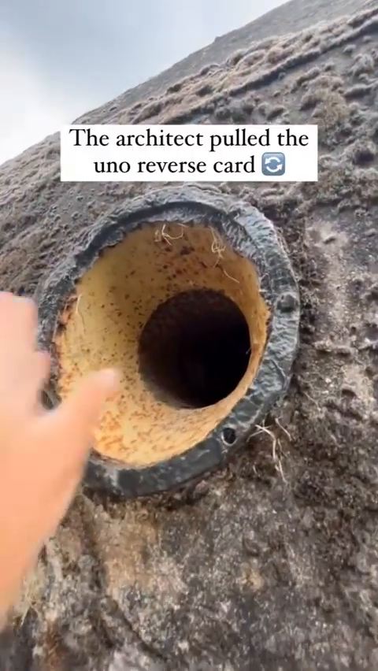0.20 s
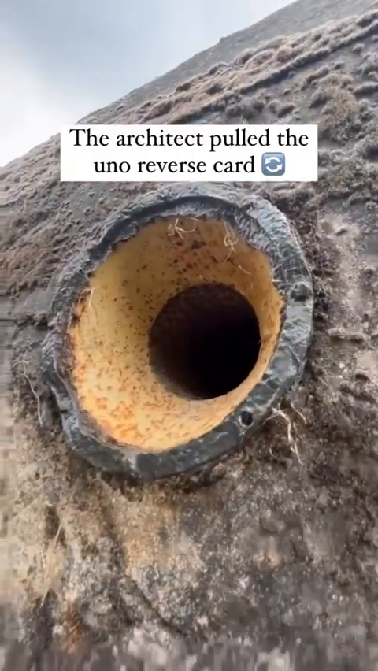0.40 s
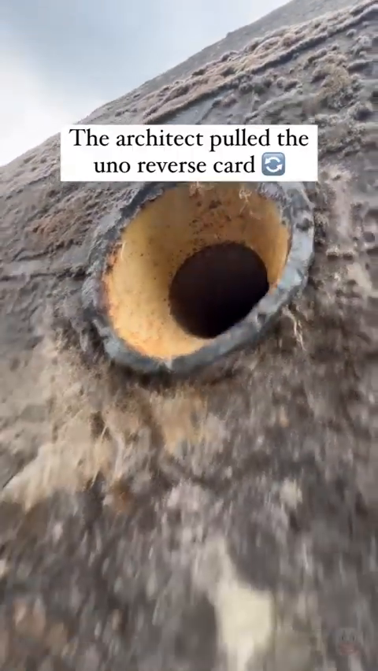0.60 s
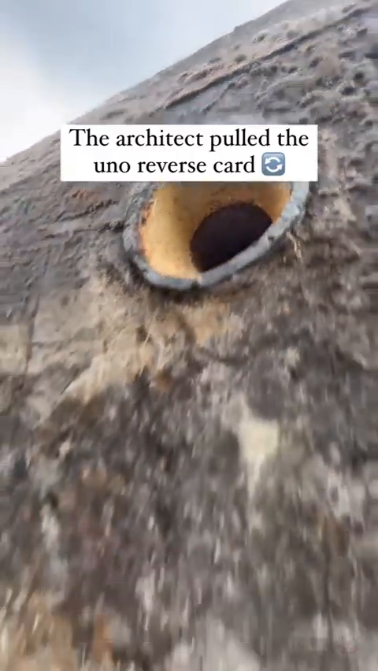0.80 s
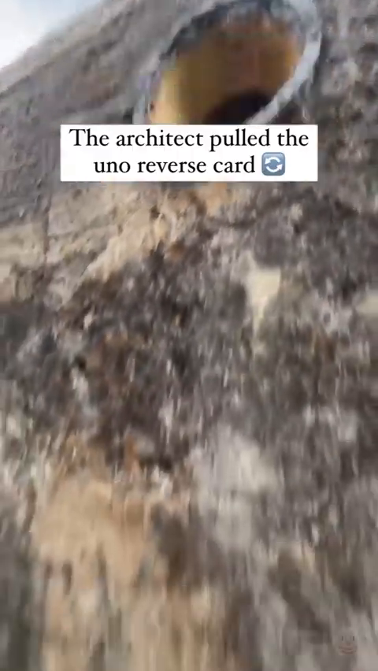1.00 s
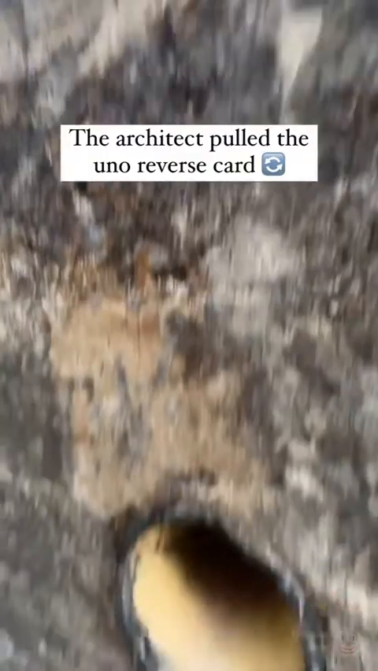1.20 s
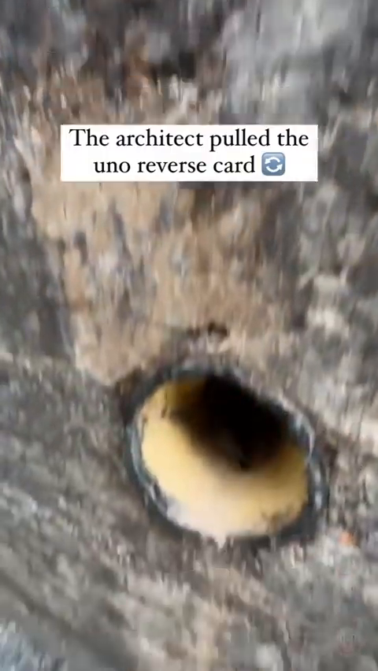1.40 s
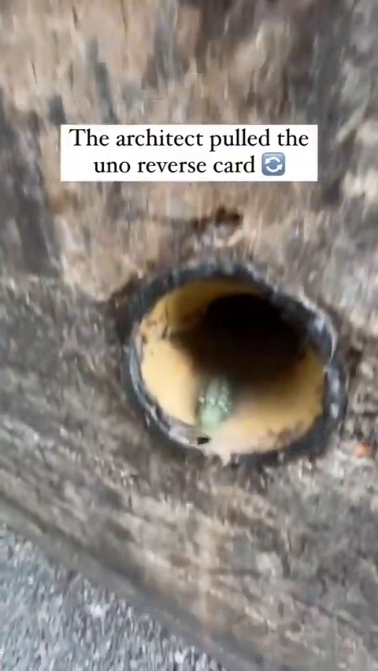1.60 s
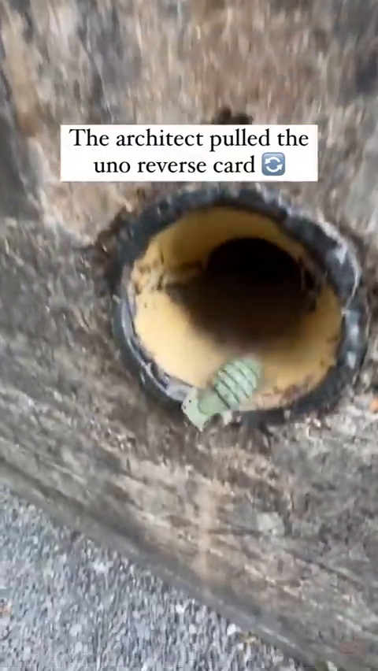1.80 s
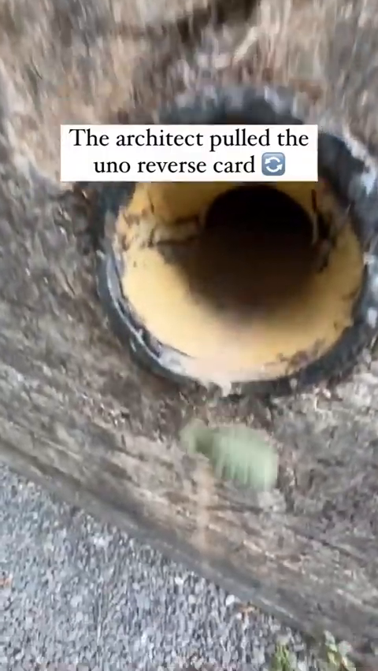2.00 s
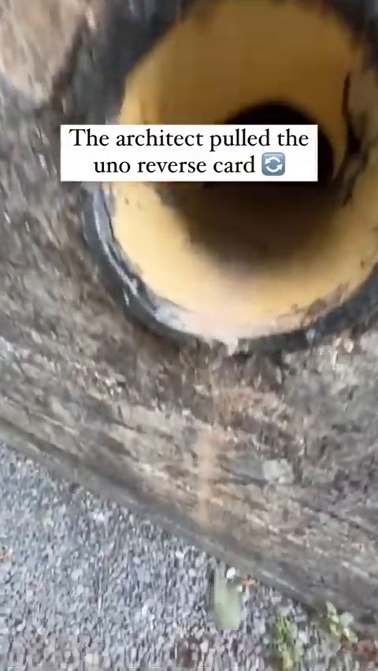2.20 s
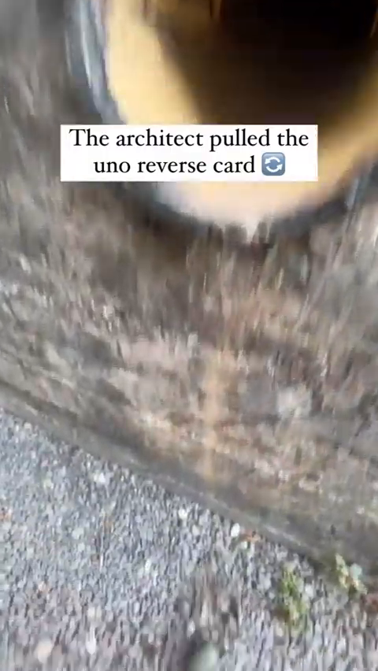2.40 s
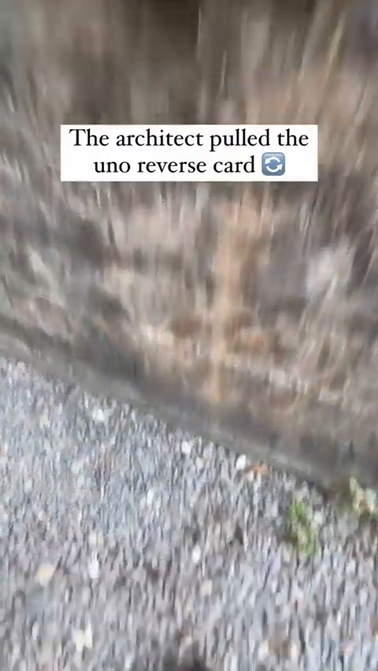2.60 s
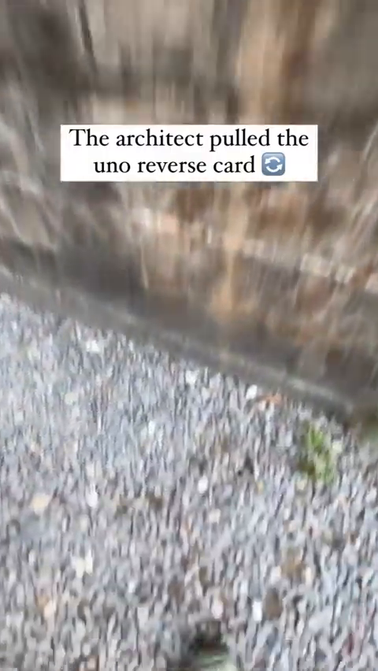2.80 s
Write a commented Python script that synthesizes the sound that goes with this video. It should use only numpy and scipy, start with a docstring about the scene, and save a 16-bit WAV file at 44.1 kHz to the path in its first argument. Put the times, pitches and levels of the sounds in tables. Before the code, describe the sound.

A heavy metal object clatters down a pipe. After a faint rustle, sharp ringing knocks and jingling scrapes run from 0.2 to 1.3 seconds, scraping hardest around 0.8. Lighter skips follow until 1.9 over a faint low hum from the pipe. After a short gap, it hits gravel at 2.3 with a thud, clinks and crunching stones, bouncing to rest by 2.8 as a soft breeze rumbles.

```python
"""At a pipe in a concrete wall, the air column hums in a light breeze. A heavy ribbed metal body is
tossed in and clatters down the bend, each impact exciting the damped modes of body and pipe, while
sliding friction keeps it jingling between knocks. It skips out of the lower mouth, falls silently
and bounces to rest in gravel, which thuds and clicks as the stones are pushed aside."""
import sys
import numpy as np
from scipy import signal
from scipy.fft import rfft, irfft
from scipy.io import wavfile

SR = 44100
rng = np.random.default_rng(int(sys.argv[2]) if len(sys.argv) > 2 else 0)


def generate_wav(signal):
    """Clip the signal to [-1, 1] and save it as 16-bit WAV at the path in sys.argv[1]."""
    frames = np.transpose(np.atleast_2d(signal))
    scaled = np.clip(frames, -1, 1) * 32767
    pcm = np.round(scaled).astype(np.int16)
    wavfile.write(sys.argv[1], SR, pcm)


N = 127890
T = np.arange(N) / SR


def from_db(db):
    """Amplitude ratio: tenfold for every 20 dB."""
    return 10 ** (np.asarray(db) / 20)


def unit_rms(x):
    """Normalisation to unit mean power."""
    return x / np.sqrt(np.mean(x ** 2) + 1e-20)


def level(points):
    """Amplitude envelope, linear in decibels between (time_s, level_db) points."""
    return from_db(np.interp(T, *np.transpose(points)))


def gate(start_s, end_s):
    """Time window with 10 ms ramps."""
    return np.clip(np.minimum(T - start_s, end_s - T) / .01, 0, 1)


def band(x, low_hz, high_hz):
    """Causal Butterworth band-pass."""
    sos = signal.butter(2, [low_hz, min(high_hz, .45 * SR)], "band", fs=SR, output="sos")
    return signal.sosfilt(sos, x)


def colour(x, points):
    """Minimum-phase filtering through (frequency_hz, gain_db) points."""
    hz, db = np.transpose(points)
    size = 4096
    gain_db = np.interp(np.log(np.fft.rfftfreq(size, 1 / SR) + 1), np.log(hz), db)
    cepstrum = irfft(np.log(from_db(gain_db)))
    cepstrum[1:size // 2] *= 2  # folding the cepstrum makes the filter causal
    cepstrum[size // 2 + 1:] = 0
    return signal.fftconvolve(x, irfft(np.exp(rfft(cepstrum))))[:len(x)]


def drift(rate_hz):
    """Low-pass noise: a smooth random fluctuation of unit rms."""
    hz = np.fft.rfftfreq(N, 1 / SR)
    return unit_rms(irfft(rfft(rng.standard_normal(N)) / (1 + (hz / rate_hz) ** 2) ** 2, N))


def add(out, start_s, sound):
    """Superposition of a delayed sound."""
    i = int(start_s * SR)
    out[i:i + len(sound)] += sound[:N - i]


def grains(per_s, spread_db):
    """Shot noise: independent clicks of uneven size."""
    sizes = from_db(spread_db * np.minimum(rng.exponential(1, N), 4)) * rng.choice([-1, 1], N)
    return sizes * (rng.random(N) < per_s / SR)


def decay(t, t60_s, rise_s):
    """Exponential damping, 60 dB in t60_s, after a smooth onset."""
    return from_db(-60 * t / t60_s) * (1 - np.exp(-t / rise_s))


def reverb(x, t60_s, wet_db, top_hz):
    """Reverberation: dense decaying reflections, their treble absorbed, join the direct sound."""
    tail = band(rng.standard_normal(SR), 100, top_hz) * decay(T[:SR], t60_s, rise_s=.004)
    return x + from_db(wet_db) * signal.fftconvolve(x, tail / np.sqrt(np.sum(tail ** 2)))[:N]


# Hum of the air column, louder as the lower mouth comes near: time_s, level_db
HUM_LEVELS = [(0, -54.5), (1.33, -40.5), (2.1, -43.5), (2.4, -52)]
# Rumble of the breeze: time_s, level_db
BREEZE_LEVELS = [(0, -53), (2.25, -54), (2.45, -40.5)]


def air(hum_hz=72.2):
    """Air-column resonance: a wavering fundamental and its octave, over outdoor hush and breeze."""
    phase = 2 * np.pi * hum_hz * T + .8 * drift(7)
    tone = np.sqrt(2) * (np.sin(phase) + from_db(-15) * np.sin(2 * phase))
    hum = level(HUM_LEVELS) * from_db(.5 * drift(14)) * tone
    hush = unit_rms(colour(rng.standard_normal(N), [(60, 2.5), (800, -10), (10000, -46)]))
    rumble = unit_rms(band(rng.standard_normal(N), 35, 92))
    return hum + from_db(-54) * hush + level(BREEZE_LEVELS) * rumble


def toss(peak_s=.135, fade_s=.04):
    """Friction noise: a soft rustle as the body is let go."""
    rustle = colour(grains(per_s=5000, spread_db=3.5), [(900, 0), (12000, -22)])
    return from_db(-44.5) * np.exp(-np.abs(T - peak_s) / fade_s) * unit_rms(rustle)


# Strength of the sliding contact: time_s, level_db
SLIDE_LEVELS = [(0.209, -33), (.47, -37.5), (.76, -38.5), (.812, -17.5), (0.881, -29), (1.061, -23),
                (1.2, -43.5), (1.6, -38.5), (1.799, -48), (2.0, -86)]
# Spectrum of the scraping: frequency_hz, gain_db
SCRAPE_SPECTRUM = [(200, 1), (2300, 7), (3200, -1.5), (4050, -3), (5200, 6), (6200, -11), (13000, -9)]


def slide():
    """Forced vibration: the ribs scrape and tap along the pipe, driving the body's upper modes."""
    taps = reverb(grains(per_s=70, spread_db=3), t60_s=.025, wet_db=10, top_hz=12000)
    contact = unit_rms(grains(per_s=5000, spread_db=3.5)) + unit_rms(taps)
    jingle = sum(from_db(db) * signal.lfilter(*signal.iirpeak(hz, Q=90, fs=SR), contact)
                 for hz, db, _ in BODY_MODES[2:])
    force = level(SLIDE_LEVELS)
    grind = .9 * force / force.max() * unit_rms(band(contact, 3850, 4250))  # hard scrapes rasp
    scrape = unit_rms(colour(contact, SCRAPE_SPECTRUM))
    rasp = scrape + from_db(-6.5) * unit_rms(jingle) + grind
    return gate(SLIDE_LEVELS[0][0], SLIDE_LEVELS[-1][0]) * force * rasp


def impacts(starts_s, levels_db, filters, t60_s):
    """Impact noise: each contact is a decaying flurry of micro-impacts, with its own or a shared filter."""
    if callable(filters):
        filters = [filters] * len(starts_s)
    out, t = np.zeros(N), T[:SR // 4]
    for start_s, db, shape in zip(starts_s, levels_db, filters):
        burst = shape(rng.choice([-1., 1.], len(t)) * decay(t, t60_s, rise_s=.0014))
        rms = np.sqrt(np.sum(burst ** 2) / (SR / 100))  # as if all its energy lay in 10 ms
        add(out, start_s, from_db(db) * burst / rms)
    return out


def passband(low_hz, high_hz):
    """A filter that confines an impact's energy to one band."""
    return lambda x: band(x, low_hz, high_hz)


def struck_spots(pitches_hz, octaves):
    """Broad local resonance: one filter for each spot that is struck."""
    edge_ratio = 2 ** (octaves / 2)
    return [passband(hz / edge_ratio, hz * edge_ratio) for hz in pitches_hz]


# Natural modes of the metal body: pitch_hz, gain_db, t60_s
BODY_MODES = [(4709, -8.5, .6), (4758, -12, 0.45), (6240, 2, 0.053), (6454, -9.5, 0.21), (6970, -11, .22),
              (8050, -6.5, 0.2), (9080, -11, 0.36), (9375, -5, 0.25), (10163, -16.5, 0.54),
              (10100, -25, .25), (10860, -5.5, 0.17)]


def body_ring(starts_s, rings_db, tumble_db=1.2, tumble_rad=.55):
    """Free vibration of struck modes; tumbling modulates their level and phase, high modes' phase most."""
    out = np.zeros(N)
    for hz, mode_db, t60_s in BODY_MODES:
        register = np.searchsorted([5500, 7500], hz)  # low, middle or high row of rings_db
        envelope = decay(T[:SR], t60_s, rise_s=.0012)
        ring = np.zeros(N, complex)
        for start_s, db in zip(starts_s, rings_db[register]):
            gain = from_db(db + mode_db + rng.normal())
            add(ring, start_s, gain * envelope * np.exp(2j * np.pi * rng.random()))
        swell = from_db(tumble_db * drift(60))
        waver = tumble_rad * drift(50) * hz / BODY_MODES[0][0]
        out += swell * np.real(ring * np.exp(1j * (2 * np.pi * hz * T + waver)))
    return out


# Resonances of the pipe, its air and wall: pitch_hz, gain_db
PIPE_MODES = [(165, 7), (705, -2.5), (1312, -0.5), (2145, -3.5), (2800, -7)]


def pipe_ring(blows, gain_db=-11.5, t60_s=.2):
    """Modal response: the resonances of the pipe, its air and wall, ring briefly after each knock."""
    t = T[:SR // 2]
    ring = sum(from_db(db - 60 * t / t60_s) * np.sin(2 * np.pi * hz * t) for hz, db in PIPE_MODES)
    return from_db(gain_db) * signal.fftconvolve(blows, ring / np.sqrt(np.sum(ring ** 2)))[:N]


# Knocks inside the pipe, levels relative within each column:
# start_s, knock_db, knock_hz, thud_db, low_ring_db, middle_ring_db, high_ring_db
PIPE_KNOCKS = [(0.2231, -5.5, 2930, -25, -14, -20.5, -28), (0.3177, -22, 1210, -22, -12, -13.5, -15),
               (0.3408, -39.5, 1080, -45.5, -46, -14, -16), (0.3961, -9.5, 2160, -25, -11.5, -25.5, -20.5),
               (0.4379, -10, 2630, -41.5, -34.5, -40, -25.5),
               (0.4582, -14.5, 2200, -28.5, -13.5, -17.5, -34), (0.5259, -12, 2170, -30, -11, -27, -14.5),
               (0.5964, -18, 2090, -28.5, -12.5, -33, -17), (0.7203, -38, 1110, -33.5, -24, -29, -9.5),
               (0.7755, -8.5, 1550, -17.5, -14, -14.5, -35), (0.7936, -10, 2240, -41, -8, -11, -22),
               (0.8991, -11, 2750, -30, -14, -22, -20.5), (1.0379, -20.5, 1040, -31.5, -24.5, -15, -22.5),
               (1.1409, -47.5, 1330, -25, -31, -35, -28), (1.2253, -21.5, 1320, -28.5, -25, -31, -37.5),
               (1.2806, -32.5, 1200, -33, -31.5, -26, -34.5)]


def clatter():
    """Impulsive excitation: blows deep in the pipe ring body and pipe, and reflections smear them."""
    starts_s, knock_db, knock_hz, thud_db, *rings_db = np.transpose(PIPE_KNOCKS)
    crack_db = (knock_db + rings_db[-1]) / 2  # hard, high-ringing blows also crack
    knocks = impacts(starts_s, knock_db - 3, struck_spots(knock_hz, octaves=.86), t60_s=.031)
    thuds = impacts(starts_s, thud_db + 1, passband(281, 900), t60_s=.057)
    cracks = impacts(starts_s, crack_db - 3, passband(5100, 13000), t60_s=.026)
    blows = knocks + thuds + cracks
    ring = body_ring(starts_s, rings_db, tumble_db=2.2, tumble_rad=1.0)
    return reverb(blows + pipe_ring(blows), t60_s=.17, wet_db=-14, top_hz=7000) + ring


# Skips near the lower mouth, levels relative: start_s, knock_db, knock_hz, thud_db, ring_db
MOUTH_SKIPS = [(1.359, -22.5, 1260, -31, -17.5), (1.4142, -22.5, 1130, -42, -21),
               (1.502, -17, 1650, -31.5, -22.5), (1.5319, -23, 3700, -47, -23),
               (1.5595, -28, 3420, -36.5, -32), (1.5788, -22, 3350, -49, -30),
               (1.6529, -28.5, 2070, -32.5, -23), (1.7338, -30.5, 2140, -45, -57),
               (1.869, -25.5, 1824, -30, -39), (1.9256, -24, 1210, -30.5, -46)]


def skips():
    """Radiation at the open end: lighter blows are heard with less reflected sound."""
    starts_s, knock_db, knock_hz, thud_db, ring_db = np.transpose(MOUTH_SKIPS)
    knocks = impacts(starts_s, knock_db - 3, struck_spots(knock_hz, octaves=1.14), t60_s=.027)
    thuds = impacts(starts_s, thud_db - 1, passband(280, 1120), t60_s=.072)
    cracks = impacts(starts_s, ring_db - 11, passband(4600, 15400), t60_s=.01)
    ring = body_ring(starts_s, [ring_db - 7.5, ring_db - 7.5, ring_db - 10])
    return reverb(knocks + thuds + cracks, t60_s=.2, wet_db=-15.5, top_hz=4860) + ring


# Bounces on the gravel, levels relative: start_s, clink_db, thud_db, ring_db
BOUNCES = [(2.3195, -9, -27, -16.5), (2.4, -20, -22.5, -15.5), (2.4919, -20.5, -50, -19.5),
           (2.5289, -17, -27.5, -12.5), (2.6068, -28, -43, -16.5), (2.6533, -34, -46, -25),
           (2.8253, -34, -62, -21)]
# Spectrum of struck stones: frequency_hz, gain_db
STONE_SPECTRUM = [(250, -6.5), (680, 11.5), (1200, 2), (3500, -1), (6300, 9.5), (13000, 6)]
# Spectrum of the ground's thud: frequency_hz, gain_db
GROUND_SPECTRUM = [(40, -8.5), (150, 4.5), (680, -4.5), (2000, -53.5)]


def gravel():
    """Inelastic collision: each bounce thuds into the ground, clinks on stones and rings the body."""
    starts_s, clink_db, thud_db, ring_db = np.transpose(BOUNCES)
    clinks = impacts(starts_s, clink_db - 4, lambda x: colour(x, STONE_SPECTRUM), t60_s=.017)
    thuds = impacts(starts_s, thud_db + 3, lambda x: colour(x, GROUND_SPECTRUM), t60_s=.06)
    shifting = pebbles(starts_s[0])
    ring = body_ring(starts_s, [ring_db - 19, ring_db - .5, ring_db - 11])
    stones = reverb(clinks + shifting, t60_s=.03, wet_db=-7.5, top_hz=13000)
    ground = reverb(thuds, t60_s=.73, wet_db=-18.5, top_hz=470)
    return stones + ground + ring


# Stones shifting after the landing: time_s, level_db
PEBBLE_LEVELS = [(2.335, -19), (2.5, -36.5), (2.66, -41), (2.79, -53)]


def pebbles(start_s, per_s=1400, spread_db=4.6):
    """Granular noise: displaced stones click at resonances of their own, over a broadband crunch."""
    pitches_hz = np.geomspace(2500, 13000, 16)
    clicks = sum(signal.lfilter(*signal.iirpeak(hz, Q=9, fs=SR), grains(per_s / len(pitches_hz), spread_db))
                 for hz in pitches_hz)
    crunch = colour(grains(per_s, spread_db), STONE_SPECTRUM)
    return gate(start_s, np.inf) * level(PEBBLE_LEVELS) * unit_rms(unit_rms(clicks) + unit_rms(crunch))


def scene():
    """Superposition: the pressures of all sources add at one point."""
    return (toss() + clatter() + skips() + slide() + gravel() + air())[None]


def record(dry):
    """Soft saturation rounds the loudest peaks, and two low-pass filters cut the top treble."""
    rounded = .85 * np.tanh(dry / .85)
    softened = signal.sosfilt(signal.butter(6, 12600, fs=SR, output="sos"), rounded)
    return signal.sosfilt(signal.ellip(10, .3, 80, 13700, fs=SR, output="sos"), softened)


dry = scene()
out = record(dry)
generate_wav(out)
```